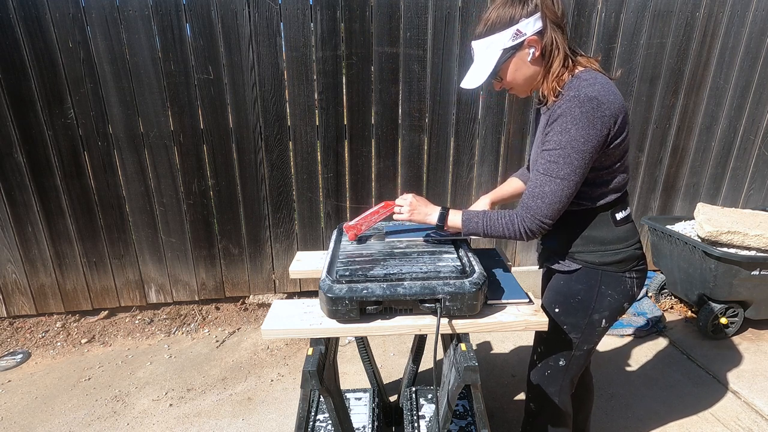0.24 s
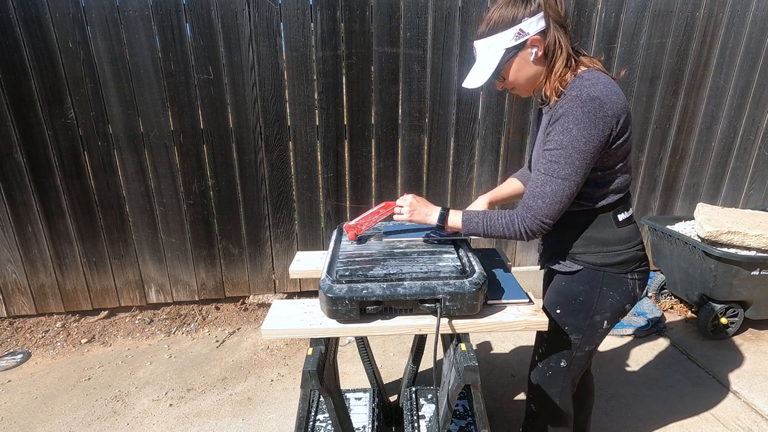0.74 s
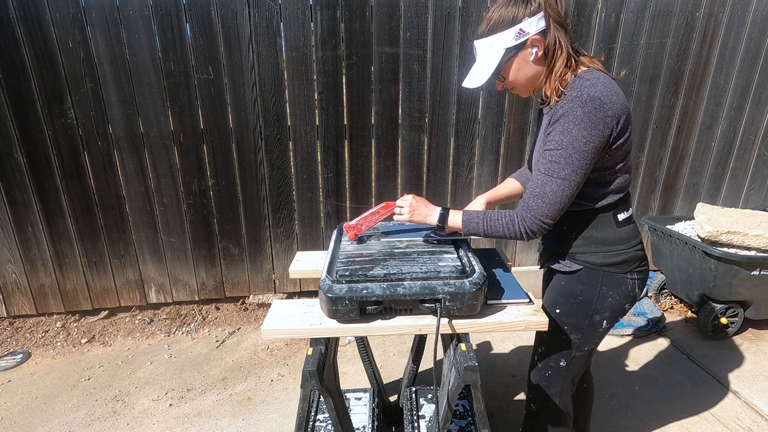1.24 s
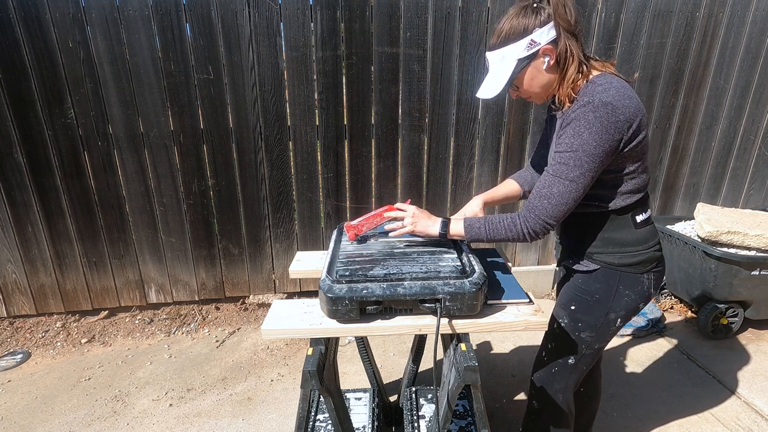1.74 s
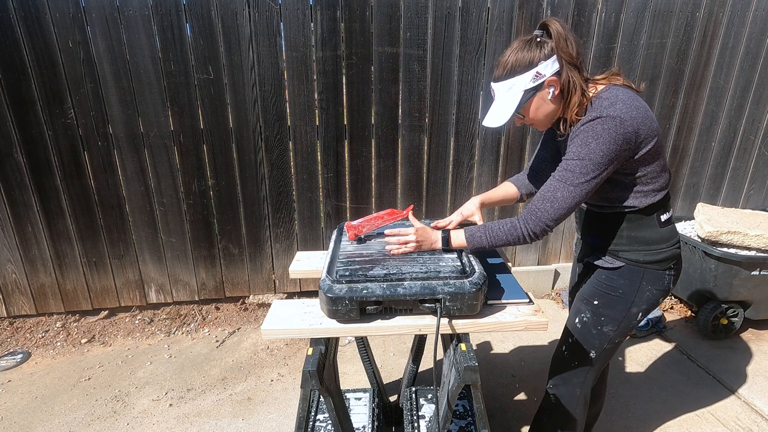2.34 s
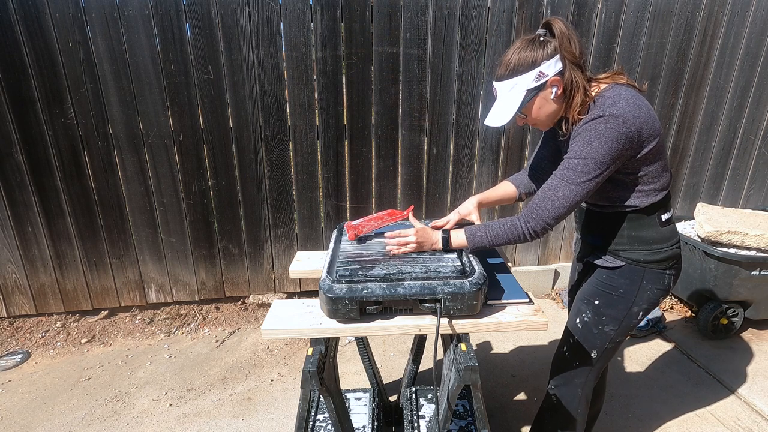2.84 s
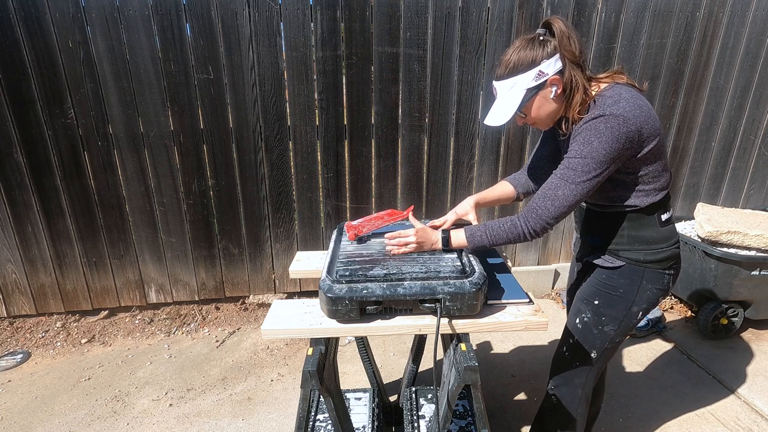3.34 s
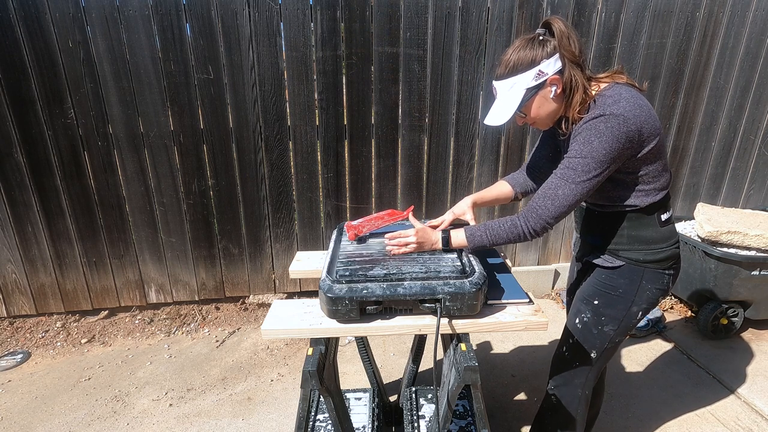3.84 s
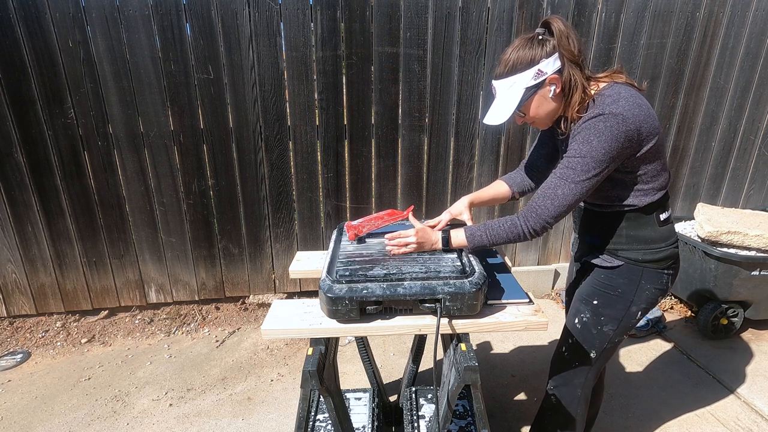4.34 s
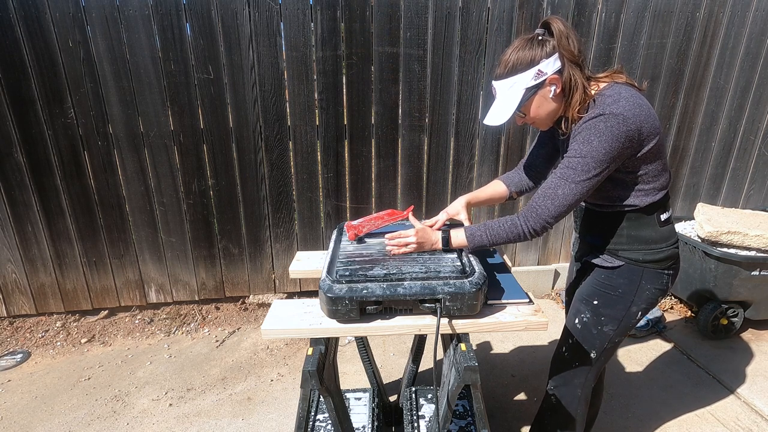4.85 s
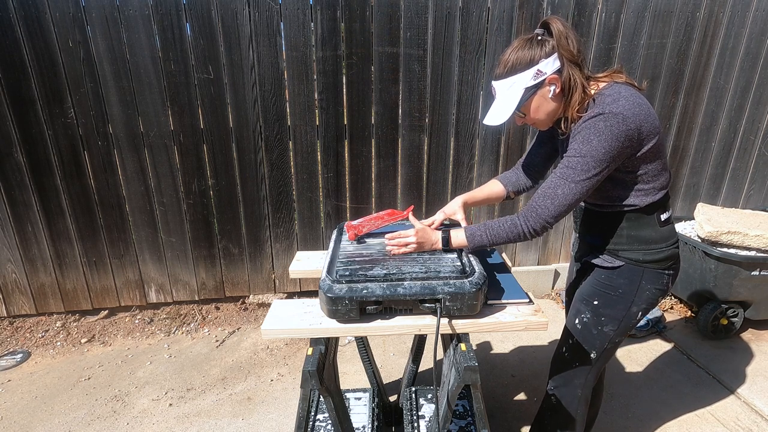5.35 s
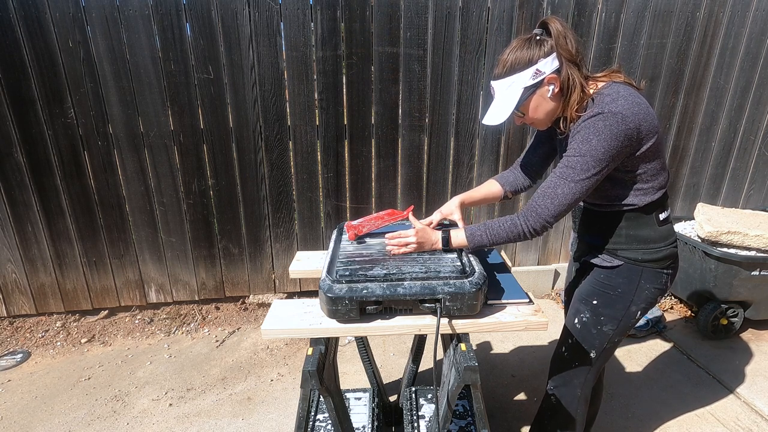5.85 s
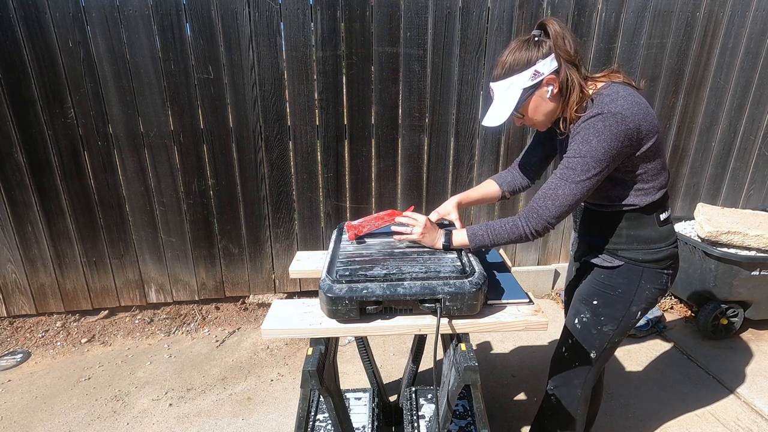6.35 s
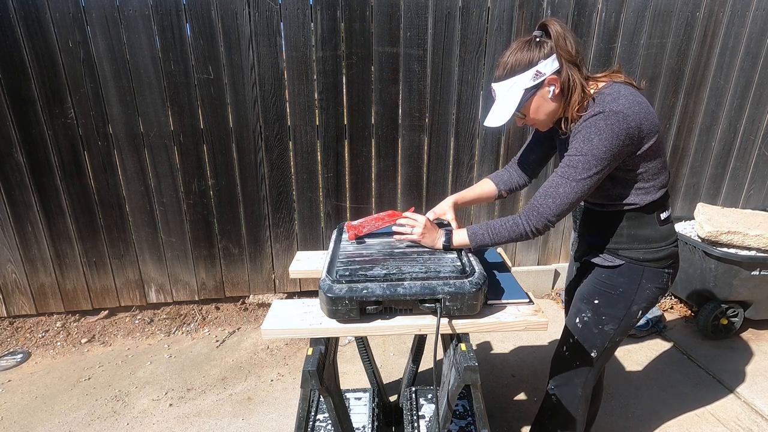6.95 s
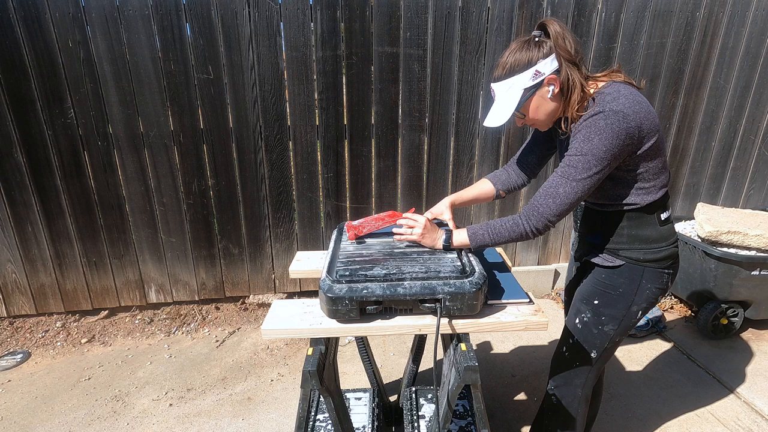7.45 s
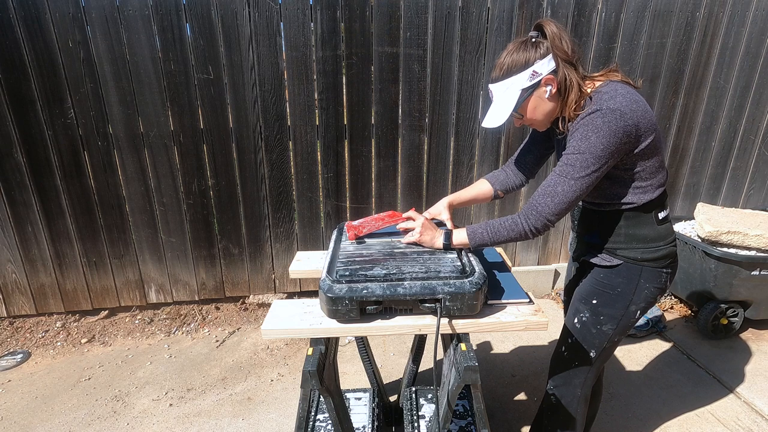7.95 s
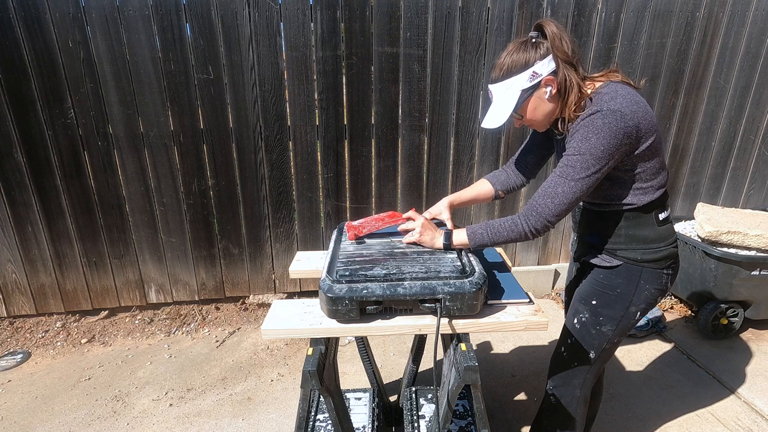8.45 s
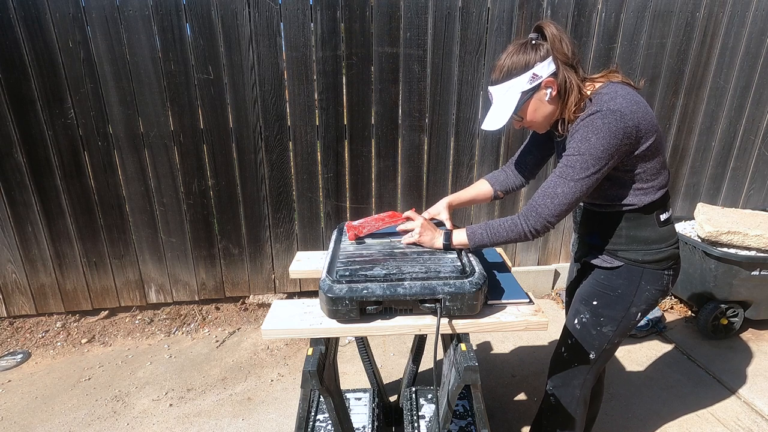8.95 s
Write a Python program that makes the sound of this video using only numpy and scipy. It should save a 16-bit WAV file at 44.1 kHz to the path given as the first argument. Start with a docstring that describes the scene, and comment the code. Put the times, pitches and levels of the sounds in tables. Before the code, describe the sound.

A small wet tile saw howls steadily outdoors, watery hiss around it, then grinds harshly into a tile before easing and speeding up slightly.

```python
"""Wet tile saw outdoors

A small wet saw on a bench before a board fence, near-mono as at one close microphone; no echo is computed.
Sines on multiples of the shaft speed make the motor's howl and buzz; shaped noise makes air, water and spray. A
tile is pushed in: the saw slows, dense random blows grind, and narrow hissing resonances of the tile sink. Near
the end the load eases and the motor speeds up."""
import sys
import numpy as np
from scipy import signal
from scipy.fft import rfft, irfft, next_fast_len
from scipy.io import wavfile
from scipy.ndimage import uniform_filter1d, map_coordinates

SR = 44100
rng = np.random.default_rng(int(sys.argv[2]) if len(sys.argv) > 2 else 0)


def dump(signal):
    """Clip the signal to [-1, 1] and save it as 16-bit WAV at the path in sys.argv[1]."""
    limited = np.clip(np.atleast_2d(signal).T, -1, 1)
    pcm = np.round(limited * 32767).astype(np.int16)
    wavfile.write(sys.argv[1], SR, pcm)


N = 406161

# Speed of the shaft: t/s, speed/(turns per s)
SHAFT_SPEED = [(0.0, 53.72), (0.17, 54.17), (0.28, 53.52), (0.59, 52.97), (1.81, 52.91), (2.13, 53.47),
               (2.77, 53.48), (3.25, 52.84), (4.04, 53.09), (4.34, 52.32), (4.57, 52.86), (4.86, 52.51),
               (5.09, 51.82), (6.5, 53.43), (7.14, 52.55), (7.45, 53.57), (7.78, 53.52), (8.14, 54.94),
               (8.62, 55.86), (9.21, 55.05)]
# How hard the tile bears on the blade: t/s, load/(0-1)
TILE_LOAD = [(0, 0.1), (2.2, 0.14), (2.35, 0.89), (2.9, 0.94), (3.35, 0.85), (4.05, 1), (4.3, 0.8),
             (4.6, 0.88), (5.0, 0.59), (5.6, 0.7), (6.2, 0.78), (6.45, 0.52), (7.6, 0.23), (8.1, 0.3),
             (9.21, 0.2)]

# Mist off the rim, spectrum before scaling to rms 1: f/Hz, relative density/dB per Hz
MIST_SPECTRUM = [(8000, -35.5), (10500, -6), (11500, 1), (12400, -7), (12850, 4), (13080, 8), (13400, -4.5),
                 (13700, -6), (14100, -2), (14900, -10), (15500, -13)]
# Spells of fine spray: start t/s, end t/s, level/dB
SPRAY_SPELLS = [(0.0, 3.2, -56), (7.9, 11, -60.5)]
SPRAY_RISE_S, SPRAY_FALL_DB_PER_S = 0.18, 6.5

# Sinking tile resonances: start t/s, end t/s, starting f/Hz, fall/(octaves per s), level/dB before colour
TILE_RESONANCES = [(2.3, 3.3, 6700, 0.03, -64), (3.15, 6.0, 14160, 0.593, -62),
                   (3.503, 4.5, 12300, 0.04, -61), (4.8, 5.751, 15300, 0.25, -68)]
# How well the tile radiates at each pitch: f/Hz, gain/dB
TILE_RADIATION = [(4400, 1), (5300, 1), (5850, 1), (6350, 7), (7000, -2), (8800, -0.5), (10500, 0),
                  (13000, -4)]
TILE_FADE_S, TILE_FLICKER_DB, TILE_FLICKERS_PER_S = 0.17, 2.5, 12

# Grinding, spectrum before housing and scaling: f/Hz, relative density/dB per Hz
GRIT_SPECTRUM = [(80, -46), (200, -33), (450, -12.5), (900, -6.5), (1500, 2), (2600, -1.5), (4000, -1.5),
                 (6500, -1), (10000, -8), (12500, -20), (15500, -18)]
# Rush of air and water, spectrum before housing and scaling: f/Hz, relative density/dB per Hz
RUSH_SPECTRUM = [(40, -39), (130, -37.5), (230, -24.5), (380, -18), (460, -2.5), (620, -2), (900, 1.7),
                 (1400, -2.5), (3000, -8.5), (6000, -2.5), (10500, -13.5), (12300, -11.5), (14500, -16),
                 (15500, -15)]
# Peaks and dips of the housing and water tray: f/Hz, width/Hz, gain/dB
HOUSING_PEAKS = [(287, 63, 8.5), (395, 47, 2), (485, 46, 9.5), (586, 43, 8), (724, 24, -2.5),
                 (975, 125, -5.5), (1150, 57, -9.5), (1174, 91, 10.5), (1350, 123, 6), (1570, 42, 0.5),
                 (2080, 500, 5.5), (2220, 55, -4.5), (2447, 140, 7), (2893, 380, 8.5), (3380, 65, 2),
                 (4024, 590, 7.5), (4066, 144, -5.5), (4300, 80, 3.5), (5250, 180, -6.5), (5800, 590, 4.5),
                 (6480, 100, -8), (7920, 97, 10.5), (8410, 440, 5.5), (9570, 1280, 8), (10580, 360, 10),
                 (11376, 150, 8)]
# Gain of the rush in the stereo side signal: f/Hz, gain/dB
SIDE_GAIN = [(70, -28), (140, -12), (300, -18.5), (550, -41.5), (800, -50), (2700, -69), (4000, -63),
             (13000, -50.5)]
RUSH_DB, RUSH_LOAD_DB = -47, 0.83  # running free; gained at full load

# Overtones of the motor's rasp: f/Hz, level/dB of each, before the mix gains
RASP_SPECTRUM = [(1000, -75), (2500, -71.5), (4000, -69.5), (6000, -69), (9000, -78.5), (11000, -81),
                 (13000, -84), (15500, -78)]
# Orders are multiples of the shaft speed. Those of the howl, whistle and top whine: order
HOWL_ORDERS = (16, 96, 240)
# Orders of the motor tones whose level follows speed and sings at resonances: order
SPEED_ORDERS = (3, 6, 9, 32, 36, 39, 45)
# Speed-following motor tones, one row an order, at the usual speed: level running free/dB, level under load/dB,
# rise/(dB per extra turn a second)
SPEED_TONES = [(-97.5, -104, 2.5), (-84, -80.5, -1.5), (-62.5, -70.5, 0), (-67, -65, -0.8),
               (-64.5, -63.5, -1.3), (-74.5, -67.5, -5.3), (-69.5, -63, -1.2)]
# Other motor tones, steady with speed, before a shared trim: order, level running free/dB, level under load/dB
OTHER_TONES = [(7.7, -75, -76), (10, -62.5, -66), (11.25, -63, -68), (12, -67, -62.5), (13, -72, -65),
               (15, -75, -69.5), (18, -66, -74), (19, -62.5, -66), (20.5, -61, -63), (22, -72, -61.5),
               (24, -62, -60.5), (25, -60.5, -64), (30, -67, -58.5), (33, -71, -66), (37, -65, -70),
               (40, -74, -63), (42, -70, -64), (48, -66, -65), (51, -73, -66), (57, -66, -68),
               (64, -66, -68), (75, -67, -65), (105, -69, -71), (108, -62.5, -69), (150, -77, -68),
               (192, -69, -73), (224, -68, -69)]
# Sharp resonances of motor and blade: f/Hz, width/Hz, gain/dB
SINGING_PEAKS = [(1780, 30, 7), (1935, 82, 7), (2067, 64, 12.5), (2340, 110, 10), (5034, 140, 6),
                 (5320, 290, 9), (12690, 310, 21.5), (13260, 250, 21.5)]
# Spells in which one motor tone drones louder: start t/s, end t/s, order, gain/dB
DRONE_SPELLS = [(1.9, 2.7, 36, 3), (2.15, 2.7, 9, 13), (3.0, 5.15, 96, 4), (4.1, 7.25, 15, 10),
                (4.997, 5.65, 42, 12), (5.11, 6.15, 6, 10), (5.35, 6.396, 9, 8.5), (5.65, 6.4, 240, 3),
                (6.349, 7.95, 16, 0.4), (7.35, 8.1, 96, 3), (8.7, 9.4, 36, 4.5)]
DRONE_FADE_S = 0.17
USUAL_SPEED = 53.3  # turns a second
WAVER_DB, WAVERS_PER_S = 1.0, 2.966  # slow drift in the level of a singing tone
HOWL_DB, HOWL_CHOKE_DB = -42.5, 7  # running free; lost at full load
CHOKE_POWER = 3.3  # only a hard push chokes the howl
WHISTLE_DB, WHISTLE_LOAD_DB = -69, 1  # running free off resonance; gained at full load
WHINE_DB, WHINE_LOAD_DB = -77.5, 2  # the same for the top whine

TOP_HZ = 15730  # band limit of the recorder


def amp(db):
    """Decibels to gain."""
    return 10 ** (np.asarray(db) / 20)


def unit(x):
    """Scale to rms 1."""
    return x / np.sqrt(np.mean(x ** 2) + 1e-20)


def along(points, hz):
    """Interpolate (Hz, value) points on a log frequency axis."""
    f, v = np.transpose(points)
    return np.interp(np.log(hz + 1), np.log(f + 1), v)


def curves(rows):
    """One value per sample for each column after the time."""
    s, *cols = np.transpose(rows)
    return [np.interp(np.arange(N) / SR, s, c) for c in cols]


def wobble(rate):
    """A smooth random curve through rate knots a second."""
    steps = np.arange(0, N + 32, 32)
    knots = rng.standard_normal(int(N * rate / SR) + 4)
    return np.interp(np.arange(N), steps, map_coordinates(knots, [steps * rate / SR]))


def spell(start, end, fade_s):
    """0 outside start to end, 1 inside, with a straight fade at each edge."""
    t = np.arange(N) / SR
    return np.clip(np.minimum(t - start, end - t) / fade_s, 0, 1)


def filtered(x, response):
    """Multiply the spectrum of x by a response of frequency."""
    m = next_fast_len(N + SR // 4)
    return irfft(rfft(x, m) * response(np.fft.rfftfreq(m, 1 / SR)), m)[..., :N]


def peaks(table, hz):
    """Summed gain in dB of (Hz, width, dB) resonances."""
    return sum(db / (1 + (2 * (hz - centre) / width) ** 2) for centre, width, db in table)


def housed(x, spectrum):
    """Give x a spectrum and the resonances of the housing, at rms 1."""
    return unit(filtered(x, lambda hz: amp(along(spectrum, hz) + peaks(HOUSING_PEAKS, hz))))


def throb(angle, depth, order):
    """A gain that swells order times a turn."""
    return 1 + depth * np.cos(order * angle)


def spray(angle):
    """Mist leaves the rim in spurts tied to the shaft; each spell starts quickly and dries up slowly."""
    t = np.arange(N) / SR
    level = 0
    for start, end, db in SPRAY_SPELLS:
        rise = np.clip((t - start) / SPRAY_RISE_S, 0, 1)
        level = level + rise * amp(db - SPRAY_FALL_DB_PER_S * np.maximum(t - end, 0))
    spurts = rng.standard_normal(N) * throb(angle, depth=0.4, order=3) * throb(angle, depth=0.22, order=6)
    mist = unit(filtered(spurts, lambda hz: amp(along(MIST_SPECTRUM, hz))))
    return level * amp(1.4 * wobble(18)) * mist


def tile(start, end, start_hz, octaves_per_s, level_db, width_hz=130):
    """A narrow noise band for a resonance excited by grinding; it sinks as the slot frees a longer strip."""
    elapsed = np.clip(np.arange(N) / SR, start, end) - start
    hz = start_hz * 2 ** (-octaves_per_s * elapsed)
    phase = 2 * np.pi * np.cumsum(hz) / SR
    # two slow noises on a cosine and a sine make a noise band around the moving pitch
    a, b = filtered(rng.standard_normal((2, N)), lambda f: 1 / (1 + (f / width_hz) ** 2))
    band = unit(a * np.cos(phase) + b * np.sin(phase))
    flicker_db = TILE_FLICKER_DB * wobble(TILE_FLICKERS_PER_S)
    level = amp(level_db + along(TILE_RADIATION, hz) + flicker_db)
    return spell(start, end, TILE_FADE_S) * level * band


def grinding(angle, load, grains_per_s=9000):
    """Diamond grit strikes the tile in dense tiny blows; the blade bites unevenly round each turn."""
    grains = rng.standard_normal(N) * (rng.random(N) < grains_per_s / SR)
    bite = throb(angle, depth=0.27, order=1) * throb(angle, depth=0.15, order=3)
    bite = bite * throb(angle, depth=0.083, order=6)
    return load * amp(-50 + 0.64 * wobble(16)) * housed(grains * bite, GRIT_SPECTRUM)


def patchy(x, patchy_db, size=13, count=9):
    """Splashing water shades each band of the hiss on its own, for moments at a time."""
    z = signal.stft(x, nperseg=512)[2]
    field = uniform_filter1d(rng.standard_normal(z.shape), size, axis=0)  # smooth over frequency
    field = uniform_filter1d(field, count, axis=1)  # smooth over time
    treble = np.clip(np.linspace(0, SR / 2, len(z)) / 4000, 0, 1)[:, None]  # full shading from 4 kHz
    return signal.istft(z * amp(patchy_db * treble * unit(field)))[1][:N]


def rush(angle, load):
    """Air and water whirled round by the blade, pulsing with the rotation."""
    flow = patchy(rng.standard_normal(N), patchy_db=0.83)
    flow = flow * throb(angle, depth=0.062, order=3) * throb(angle, depth=0.12, order=9)
    level = amp(RUSH_DB + RUSH_LOAD_DB * load + 0.39 * wobble(12))
    return level * housed(flow, RUSH_SPECTRUM)


def rasp(angle, count=85, size=16384):
    """The motor repeats a scrape three times a turn: a comb of faint overtones, partly wavering."""
    named = [*HOWL_ORDERS, *SPEED_ORDERS, *(row[0] for row in OTHER_TONES)]
    orders = 3 * np.arange(7, 7 + count)
    mean_speed = np.mean(SHAFT_SPEED, axis=0)[1]
    gain = amp(along(RASP_SPECTRUM, orders * mean_speed))
    gain = gain * ~np.isin(orders, named)  # leave out orders that have their own tone
    lines = np.zeros((3, size), complex)
    lines[:, orders] = gain * np.exp(2j * np.pi * rng.random((len(lines), count)))
    turns = irfft(lines, 2 * size) * size * np.sqrt(2)  # three waveforms, each one turn long
    position = (angle / np.pi * size).astype(int) % (2 * size)
    steady, *drifting = turns[:, position]
    wavering = sum(wobble(5) * scrape for scrape in drifting)
    return amp(-7.5) * steady + amp(-6.5) * wavering


def tone(angle, order, flutter):
    """One multiple of the shaft angle, about rms 1; turbulence shakes its level and phase."""
    phase = order * angle + rng.uniform(0, 2 * np.pi) + flutter * wobble(25)
    return np.sqrt(2) * (1 + flutter * wobble(25)) * np.sin(phase)


def singing(order, speed):
    """dB gained as the speed carries a tone across the sharp resonances, with a slow waver."""
    speeds = np.linspace(speed.min(), speed.max(), 200)
    resonance_db = np.interp(speed, speeds, peaks(SINGING_PEAKS, order * speeds))
    return resonance_db + WAVER_DB * wobble(WAVERS_PER_S)


def droning(order):
    """dB that a tone gains in its spells of droning."""
    return sum(db * spell(start, end, DRONE_FADE_S)
               for start, end, k, db in DRONE_SPELLS if round(k) == order)


def buzz(angle, speed, load):
    """The motor's lesser tones; load shifts their balance, and speed that of the first group, which also sings
    at resonances."""
    following = others = 0
    for order, (free, loaded, rise) in zip(SPEED_ORDERS, SPEED_TONES):
        level_db = free + load * (loaded - free) + droning(order)
        level_db = level_db + rise * (speed - USUAL_SPEED) + singing(order, speed)
        following = following + amp(level_db) * tone(angle, order, flutter=0.16)
    for order, free, loaded in OTHER_TONES:
        level_db = free + load * (loaded - free) + droning(order)
        others = others + amp(level_db) * tone(angle, order, flutter=0.21)
    return following + amp(-2.0) * others


def whine(angle, speed, load):
    """The fan's howl, choked by a hard push, and the motor's whistle and top whine, which sing at some speeds."""
    howl_order, whistle_order, whine_order = HOWL_ORDERS
    howl_db = HOWL_DB - HOWL_CHOKE_DB * load ** CHOKE_POWER + droning(howl_order)
    whistle_db = WHISTLE_DB + WHISTLE_LOAD_DB * load
    whistle_db = whistle_db + singing(whistle_order, speed) + droning(whistle_order)
    whine_db = WHINE_DB + WHINE_LOAD_DB * load
    whine_db = whine_db + singing(whine_order, speed) + droning(whine_order)
    howl = amp(howl_db) * tone(angle, howl_order, flutter=0.029)
    whistle = amp(whistle_db) * tone(angle, whistle_order, flutter=0.26)
    top = amp(whine_db) * tone(angle, whine_order, flutter=0.12)
    return howl + whistle + top


def scene():
    """One shaft drives motor, blade and water; almost mono, with a little width in the hiss."""
    speed, = curves(SHAFT_SPEED)
    load = np.clip(curves(TILE_LOAD)[0], 0, 1.2)
    unsteady = (0.000501 + 0.00049 * load) * wobble(14)  # the load tugs at the shaft
    angle = 2 * np.pi * np.cumsum(speed * (1 + unsteady)) / SR
    cut = grinding(angle, load) + sum(tile(*row) for row in TILE_RESONANCES)
    motor = rasp(angle) + buzz(angle, speed, load) + whine(angle, speed, load)
    mid = spray(angle) + cut + rush(angle, load) + motor
    # a second, independent rush gives the width
    side = filtered(rush(angle, load), lambda hz: amp(along(SIDE_GAIN, hz)))
    return np.array([mid + side, mid - side])


def record(dry):
    """The microphone and recorder keep nothing above the band limit."""
    return filtered(dry, lambda hz: hz < TOP_HZ)


dry = scene()
out = record(dry)
dump(out)
```